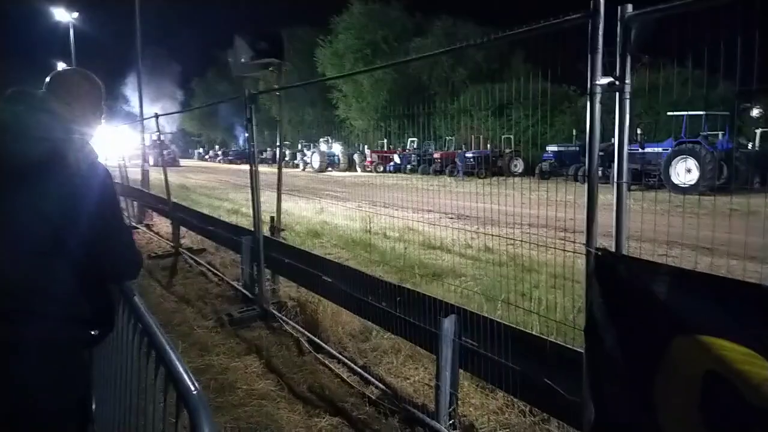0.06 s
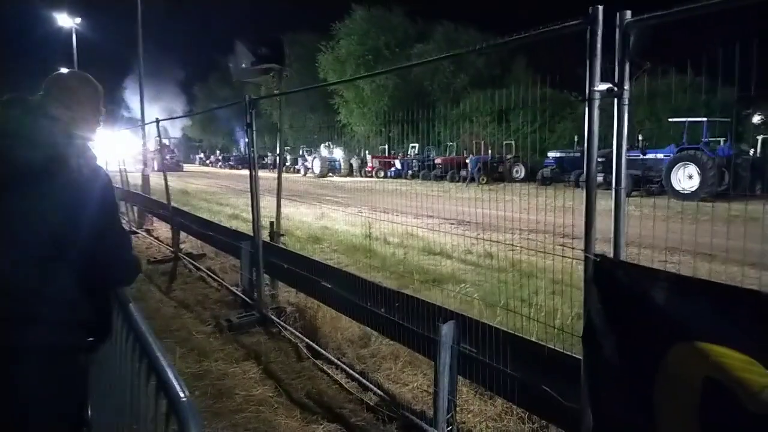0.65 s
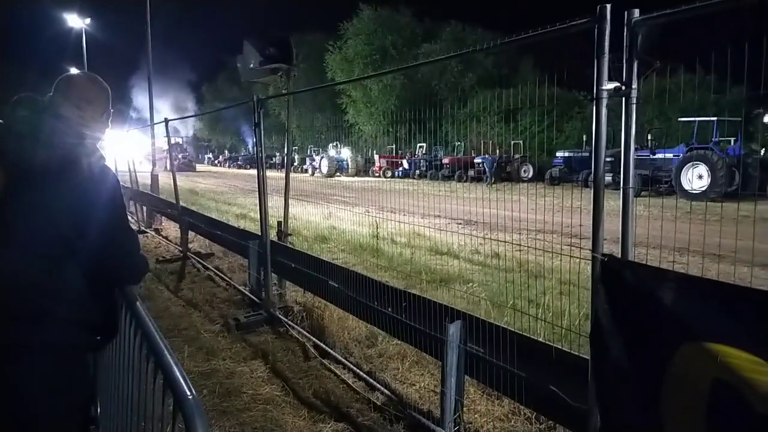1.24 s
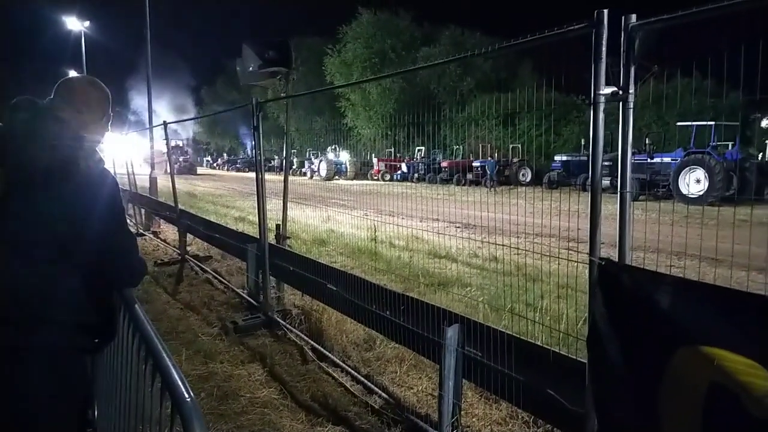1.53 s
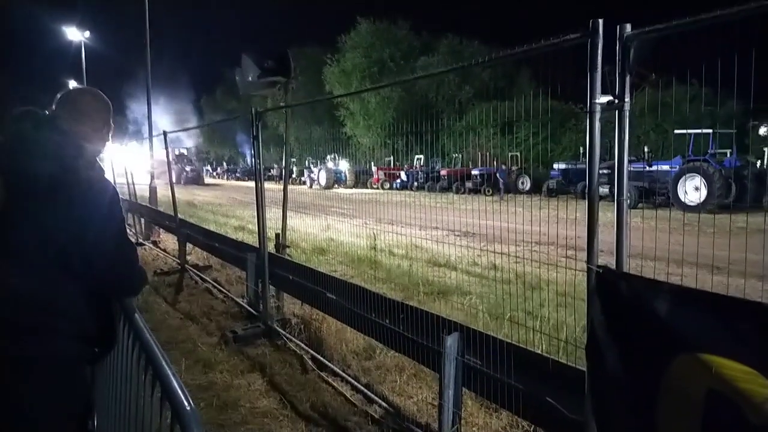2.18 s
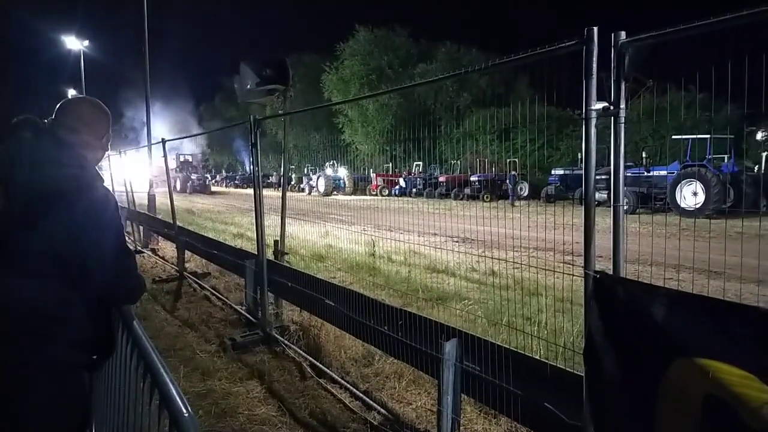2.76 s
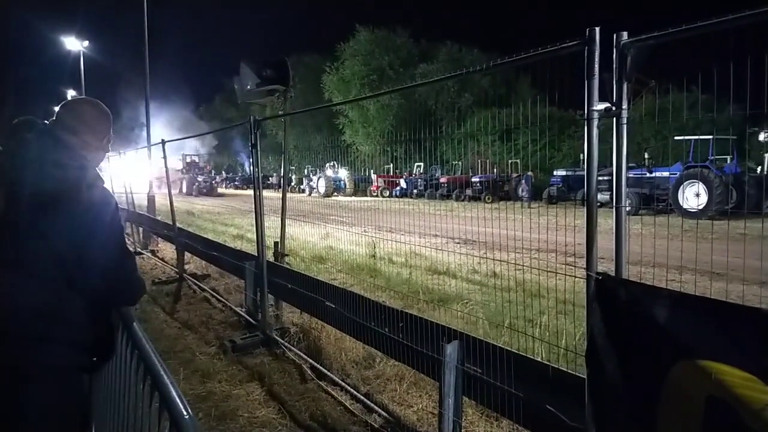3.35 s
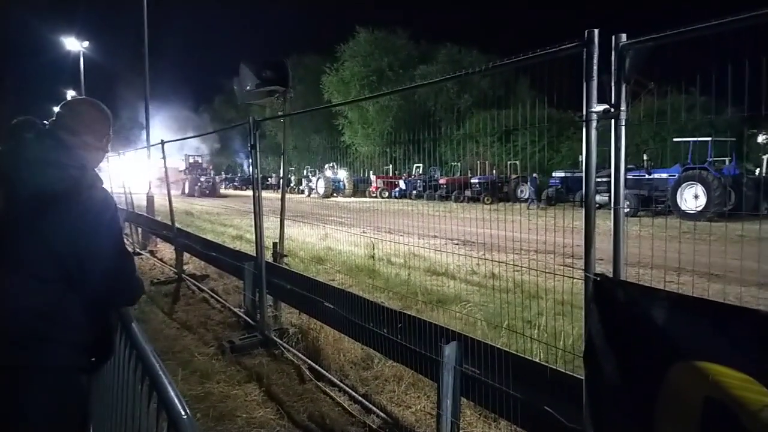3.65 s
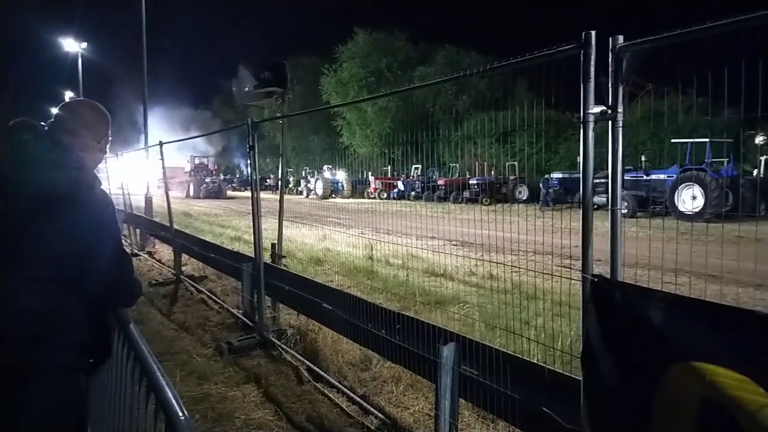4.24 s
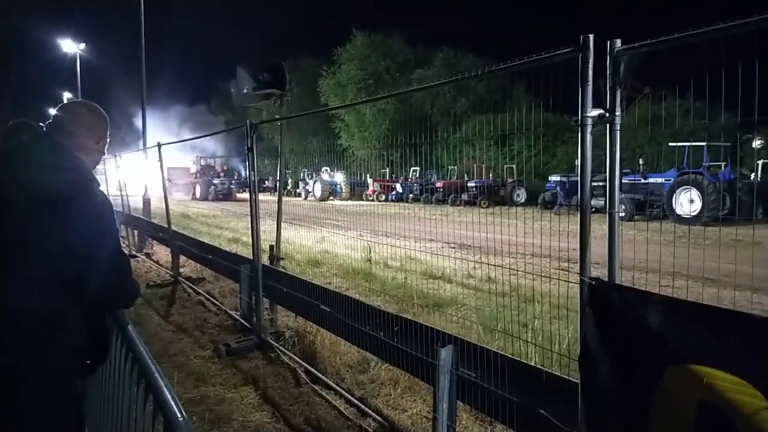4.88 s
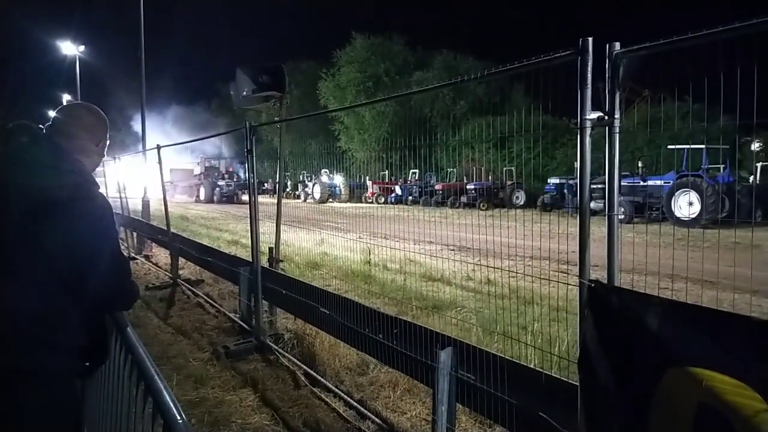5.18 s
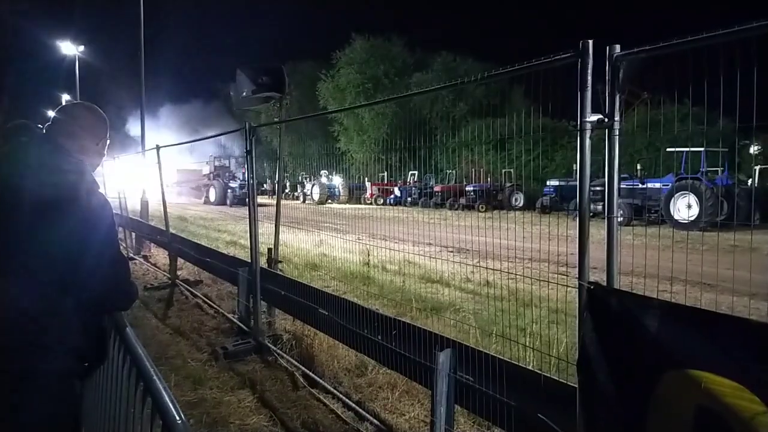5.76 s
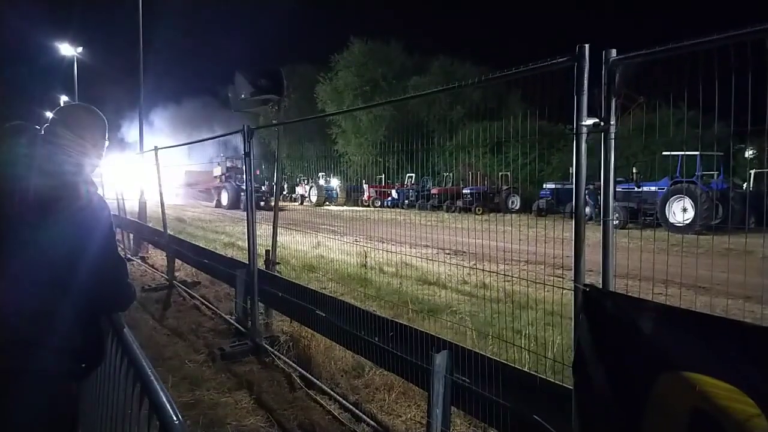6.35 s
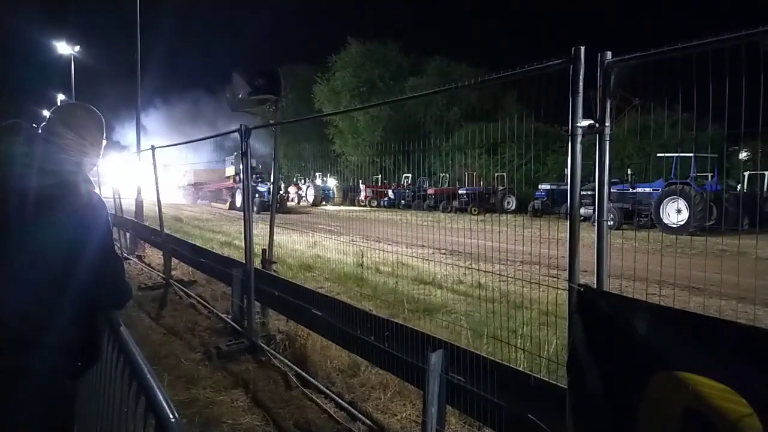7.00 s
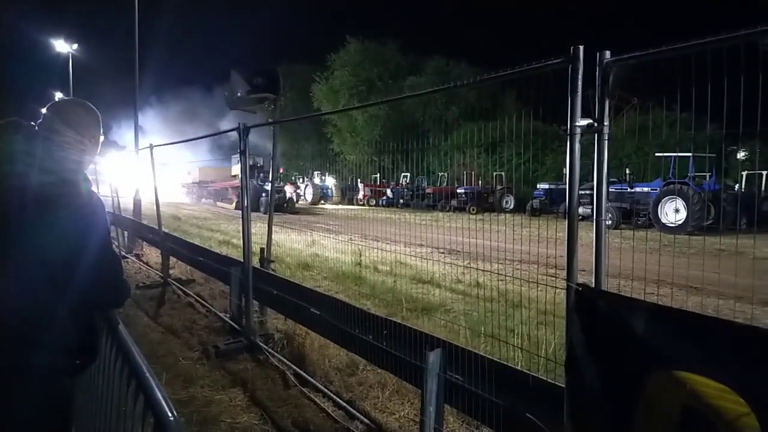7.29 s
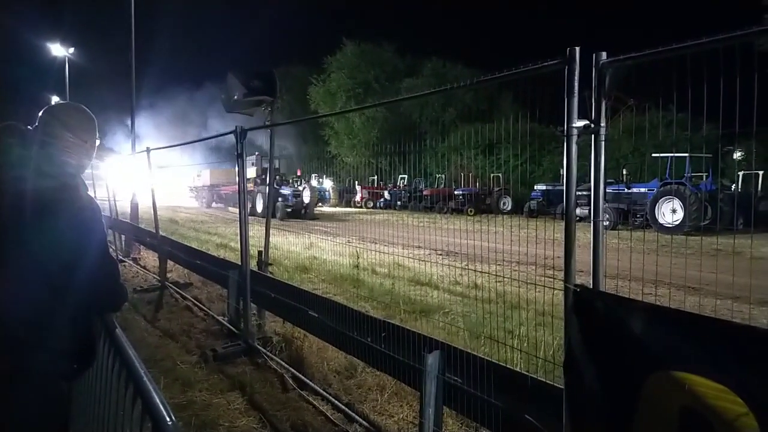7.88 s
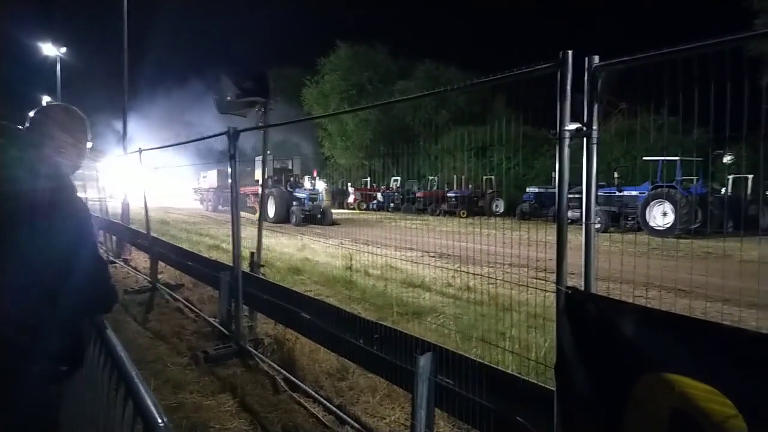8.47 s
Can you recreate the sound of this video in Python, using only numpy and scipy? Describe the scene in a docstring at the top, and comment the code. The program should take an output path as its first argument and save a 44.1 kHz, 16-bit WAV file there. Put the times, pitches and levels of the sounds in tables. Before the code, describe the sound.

A turbocharged tractor engine drones and rasps steadily under heavy load, gradually approaching over a low rumble.

```python
"""A turbocharged six-cylinder pulling tractor drags a sled at full throttle, slowly nearing on a dirt track.
Each firing leaves the open stack as a pressure pulse and a rasping burst of gas; the turbo whistles above.
The ground reflection colours the hiss on the approach, and the tree line answers faintly.
Plume and sled rumble underneath, with a dying breeze on the microphone."""
import sys
import numpy as np
from scipy import signal
from scipy.fft import rfft, irfft, next_fast_len
from scipy.io import wavfile
from scipy.ndimage import map_coordinates

SR = 44100
rng = np.random.default_rng(int(sys.argv[2]) if len(sys.argv) > 2 else 0)


def wav_record(signal):
    """Record a signal, one row per channel, as 16-bit PCM in the file named by sys.argv[1]."""
    frames = np.transpose(np.atleast_2d(signal))
    bounded = np.clip(frames, -1, 1)
    # unit amplitude maps onto the largest positive 16-bit level
    quanta = np.round(bounded * 32767).astype(np.int16)
    wavfile.write(sys.argv[1], SR, quanta)


N = 384993

# Cylinders in firing order. Each row: strength in dB, lateness in firing intervals.
CYLINDERS = [(-2.5, -0.00069), (-4.5, 0.041), (-2.5, -.06), (-5, 0.029), (-3.5, 0.086), (-6.5, -0.12)]
# Exhaust roar envelope. Each row: time in seconds, level in dB.
ROAR_LEVEL = [(0.27, -20.5), (0.72, -20.5), (0.87, -18.4), (0.97, -24), (1.12, -19), (1.27, -19),
              (1.62, -23), (1.72, -20), (2.67, -19.5), (2.92, -22.5), (3.32, -19), (3.57, -21.5),
              (4.02, -20), (4.07, -18), (4.27, -21), (4.42, -19.3), (5.67, -20), (5.87, -20.8), (6.27, -19),
              (7.12, -19.5), (7.77, -20.5), (7.97, -23.5), (8.22, -20.5), (8.68, -23)]


def amp(db):
    """Decibels to gain."""
    return 10 ** (np.asarray(db) / 20)


def unit(x):
    """Scale to rms 1."""
    return x / np.sqrt(np.mean(x ** 2) + 1e-20)


def clock():
    """Sample times in seconds."""
    return np.arange(N) / SR


def ramp(times_s, values):
    """Values joined by straight lines, per sample."""
    return np.interp(clock(), times_s, values)


def curve(rows):
    """Ramp through (seconds, value) rows."""
    return ramp(*np.transpose(rows))


def noise():
    """White noise."""
    return rng.standard_normal(N)


def wobble(knots_per_s):
    """Smooth random curve, rms near 1."""
    knots = rng.standard_normal(int(N * knots_per_s / SR) + 4)
    return map_coordinates(knots, [np.arange(N) * knots_per_s / SR])


def filtered(x, gain_at_hz):
    """Zero-phase filter."""
    size = next_fast_len(N + 8192)
    return irfft(rfft(x, size) * gain_at_hz(np.fft.rfftfreq(size, 1 / SR)), size)[:N]


def coloured(x, spectrum):
    """Minimum-phase filter from (Hz, dB) rows; output at rms 1."""
    size = 8192
    hz, db = np.transpose(spectrum)
    shape_db = np.interp(np.log(np.fft.rfftfreq(size, 1 / SR) + 1), np.log(hz + 1), db)
    cepstrum = irfft(np.log(amp(shape_db) + 1e-6))
    cepstrum[1:size // 2] *= 2
    cepstrum[size // 2 + 1:] = 0
    impulse_response = irfft(np.exp(rfft(cepstrum)))
    return unit(signal.fftconvolve(x, impulse_response)[:N])


def by_distance(far, midway, near):
    """Crossfade three values or signals as the tractor nears."""
    times_s = [3, 5, 6.9, 7.8]
    return (far * ramp(times_s, [1, 0, 0, 0])
            + midway * ramp(times_s, [0, 1, 1, 0])
            + near * ramp(times_s, [0, 0, 0, 1]))


def breeze():
    """Soft, deep buffeting of the microphone, dying away."""
    # Each row: frequency in Hz, relative density in dB.
    spectrum = [(10, -6), (22, -9), (50, -3), (110, -13), (300, -54)]
    fall_db_per_s, gust_db = 2.5, 4
    return amp(-43.5 - fall_db_per_s * clock() + gust_db * wobble(8)) * coloured(noise(), spectrum)


def rumble():
    """Low turbulence of the exhaust plume and the dragged sled."""
    # Each row: frequency in Hz, relative density in dB.
    spectrum = [(18, -52), (30, -12), (107, -8), (156, -1.5), (179, -5.5), (209, -12), (304, -9.5),
                (364, -10), (650, -14), (840, -38), (1430, -120)]
    return amp(-41 + 2.7 * wobble(7)) * coloured(noise(), spectrum)


def tree_echo(x, t60_s, delay_s):
    """Dull, scattered answer from the tree line."""
    t = np.arange(SR // 2) / SR
    tail = rng.standard_normal(len(t)) * amp(-60 * t / t60_s) * (t > delay_s)
    echo = signal.fftconvolve(x, tail / np.linalg.norm(tail))[:N]
    return filtered(echo, lambda hz: 1 / (1 + (hz / 6000) ** 2))


def approaching(x, *spectra):
    """Far, midway and near spectra in turn: the ground reflection's notches shift."""
    return by_distance(*(coloured(x, spectrum) for spectrum in spectra))


def off_boost_db():
    """Level shortfall until the turbo has built up pressure."""
    return ramp([0.95, 1.12], [-2.5, 0])


def turbo(firing_hz):
    """The blade tone lags the engine speed; turbulent exhaust smears it into a fluttering band."""
    inertia_s, cruise_firing_hz, cruise_whistle_hz = .43, 150, 14358
    whistle_per_firing, heating_hz_per_s = 73, 97.5
    speed_db_per_hz, approach_db_per_s = .0025, .6
    width_hz, skirt_db = 160, -12
    pole = np.exp(-1 / (inertia_s * SR))
    lagged_hz = firing_hz[0] + signal.lfilter([1 - pole], [1, -pole], firing_hz - firing_hz[0])
    rise_hz = whistle_per_firing * (lagged_hz - cruise_firing_hz) + heating_hz_per_s * clock()
    roar_db = curve(ROAR_LEVEL)
    surge_db = .5 * (roar_db - np.mean(roar_db)) + off_boost_db()
    level_db = -37.5 + speed_db_per_hz * rise_hz + approach_db_per_s * clock() + surge_db
    angle = 2 * np.pi * np.cumsum(cruise_whistle_hz + rise_hz + 35 * wobble(7)) / SR
    band = lambda hz: np.exp(-.5 * (hz / width_hz) ** 2) + amp(skirt_db) / (1 + (hz / width_hz / 3) ** 2)
    whistle = filtered(noise(), band) * np.cos(angle) + filtered(noise(), band) * np.sin(angle)
    flutter_db = 1.4 * wobble(18) + 1.8 * wobble(130)
    return amp(level_db) * unit(whistle * amp(flutter_db))


def engine_line(phase, order, drift_rad):
    """Sine at order times the firing rate, rms 1, with drifting phase."""
    return np.sqrt(2) * np.sin(2 * np.pi * (order * phase + rng.random()) + drift_rad * wobble(5))


def drone(phase, firing_hz):
    """Firing tone and octave, plus the weaker lines of the uneven four-stroke cycle."""
    # Firing tone, louder when the engine lugs. Each row: time in seconds, level in dB.
    tone_level = [(0.27, -27), (1.57, -31.5), (2.67, -27.5), (2.92, -32), (3.32, -27), (3.47, -31.5),
                  (4.17, -29.5), (4.47, -30.5), (4.87, -25.5), (4.97, -30), (5.32, -24), (5.52, -26),
                  (5.97, -25), (6.42, -29.5), (7.52, -26.5), (7.77, -31), (8.27, -26.5), (8.68, -27.5)]
    # Each row: multiple of the cycle rate, base level in dB.
    cycle_lines = [(2, -51.5), (3, -47), (4, -46.5), (9, -51.5), (10, -56), (11, -56), (13, -54), (15, -55),
                   (16, -56), (17, -59), (18, -49.5), (20, -48.5), (24, -57.5), (25, -56), (26, -51),
                   (28, -46.5), (30, -52)]
    # Resonances lifting any cycle line that glides through. Each row: centre in Hz, width in Hz, lift in dB.
    pipe_modes = [(432, 18, 11), (510, 20, 3), (727, 20, 3)]
    tone_db = curve(tone_level)
    load_db = tone_db - np.mean(tone_db)
    octave_db = by_distance(-38, -37.5, -35.5) + 0.38 * load_db
    tone = amp(tone_db + 0.98 * wobble(9)) * engine_line(phase, 1, drift_rad=.06)
    octave = amp(octave_db + 1.8 * wobble(10)) * engine_line(phase, 2, drift_rad=.19)
    # Upper lines gain on the approach and as harder firing steepens the pulses.
    tilt_db_per_order = by_distance(-1.1, -0.14, 0.57) + 0.19 * load_db
    throb = np.zeros(N)
    for multiple, base_db in cycle_lines:
        order = multiple / len(CYLINDERS)
        lift_db = sum(db / (1 + (2 * (order * firing_hz - hz) / width_hz) ** 2)
                      for hz, width_hz, db in pipe_modes)
        line_db = base_db + lift_db + order * tilt_db_per_order + 1.9 * wobble(2.92)
        throb += amp(line_db) * engine_line(phase, order, drift_rad=.25)
    return tone + octave + throb


def firings(phase, scatter_db, jitter_intervals):
    """One impulse per firing; each cylinder has its own strength and lateness."""
    number = np.arange(1, int(phase[-1]) - 1)
    strength_db, lateness = np.array(CYLINDERS)[number % len(CYLINDERS)].T
    jitter, scatter = rng.standard_normal((len(number), 2)).T
    onsets = np.searchsorted(phase, number + lateness + jitter_intervals * jitter)
    return np.bincount(onsets, amp(strength_db + scatter_db * scatter), N)[:N]


def gas_bursts(pulses, life_s, steady_flow):
    """Turbulent gas swells and dies after each firing, over a steady flow."""
    t = np.arange(SR // 20) / SR
    envelope = unit(signal.fftconvolve(pulses, t * np.exp(-t / life_s))[:N])
    return unit(noise() * (envelope + steady_flow))


def exhaust(pulses):
    """The stack barks near 900 Hz and rasps near 3 kHz; steep shock fronts crackle in the jet."""
    # Spectra by distance. Each row: frequency in Hz, relative density in dB.
    bark_far = [(310, -41), (520, -16.5), (564, -17), (708, -4.5), (764, -3), (904, 4.5), (1060, 1.5),
                (1310, -6.5), (1580, -3), (1710, -10), (1900, -14.5), (2470, -29), (4180, -120)]
    bark_near = [(310, -35.5), (500, -9), (600, -9), (720, -.5), (900, 4), (1060, 1), (1310, -6),
                 (1720, -8), (1900, -12), (2470, -28), (4180, -120)]
    rasp_far = [(1000, -33), (1700, -18.5), (2000, -6.5), (2310, -7), (2660, 2.5), (3360, 1.5),
                (3560, -0.5), (3910, -15.5), (4320, -7.5), (4800, -26), (6240, -41), (10600, -120)]
    rasp_midway = [(1000, -52), (1700, -23), (2040, -12), (2240, -11), (2740, 1.5), (3110, -2),
                   (3570, -7.5), (3780, -15.5), (4310, -13.5), (4680, -19.5), (4800, -43), (6240, -51),
                   (10600, -120)]
    rasp_near = [(1000, -58), (1700, -17), (1930, -6.5), (2280, -7.5), (2680, 3), (2840, -1), (3350, -1),
                 (3710, -9), (4120, -7), (4520, -13), (4800, -20), (6240, -40), (10600, -120)]
    hiss_far = [(2710, -28), (4600, -4.5), (4860, -11.5), (5290, 1), (5470, 2), (5770, -9.5), (6320, 4.5),
                (6610, -3.5), (6920, -3), (8220, -8), (9420, -16), (10400, -11.5), (12800, -17.5),
                (13400, -15), (13600, -18.5)]
    hiss_midway = [(2710, -36), (4600, -9.5), (4680, -13), (4990, 0.5), (5520, -0.5), (7240, 1),
                   (7780, 0.5), (8220, -7), (8640, -6), (9290, -13), (10100, -6.5), (13600, -12.5)]
    hiss_near = [(2710, -22), (4600, -10), (4930, 0.5), (5430, -4), (5980, 1.5), (6550, -4), (7120, 3.5),
                 (7630, -6), (8320, -1.5), (9080, -14.5), (9870, -6.5), (11500, -7), (13800, -10.5)]
    bark_db = by_distance(-9.5, -10.5, -7) + off_boost_db()
    hiss_db = by_distance(-7.5, -9.5, -4)
    puffs = 0.62 * unit(pulses) + gas_bursts(pulses, life_s=.00094, steady_flow=2.1)
    bark = approaching(puffs, bark_far, bark_near, bark_near)
    gas = gas_bursts(pulses, life_s=.0018, steady_flow=1)
    rasp = approaching(gas, rasp_far, rasp_midway, rasp_near)
    jet = unit(gas_bursts(pulses, life_s=.0021, steady_flow=2) * amp(1.53 * wobble(900)))
    hiss = approaching(jet, hiss_far, hiss_midway, hiss_near)
    sizzle = amp(-15) * coloured(jet, [(12000, -34), (13600, 10), (16000, -11)])
    return amp(curve(ROAR_LEVEL)) * (rasp + amp(bark_db) * bark + amp(hiss_db) * (hiss + sizzle))


def scene():
    """Engine speed times the pulses and tones and drives the turbo; moving air makes the treble waver."""
    # Surging and sagging under the sled. Each row: time in seconds, firing rate in Hz.
    engine_speed = [(0.22, 147.9), (0.52, 143.3), (0.87, 145.2), (1.22, 152.6), (1.52, 151.6),
                    (1.72, 156.4), (1.97, 153.6), (2.37, 156.0), (2.67, 150.6), (2.87, 160.3),
                    (3.12, 157.1), (3.32, 157.9), (3.42, 164.9), (3.67, 160.7), (3.92, 166.5),
                    (4.27, 155.9), (5.07, 149.5), (5.27, 145.6), (5.57, 148.9), (5.92, 143.7),
                    (6.42, 148.6), (6.62, 146.9), (6.72, 152.8), (7.27, 156.1), (7.52, 152.3),
                    (7.77, 156.4), (7.97, 154.3), (8.7, 157.4)]
    firing_hz = curve(engine_speed)
    phase = np.cumsum(firing_hz) / SR  # in firings
    roar = exhaust(firings(phase, scatter_db=1.3, jitter_intervals=.012))
    echo = amp(-9.5) * tree_echo(roar, t60_s=.27, delay_s=.03)
    air_waver = amp(0.54 * wobble(13))
    tractor = drone(phase, firing_hz) + air_waver * (roar + turbo(firing_hz))
    return (tractor + echo + rumble() + breeze())[None]


def record(dry):
    """The sound cuts in after a brief silence; the microphone rounds off the tallest peaks."""
    start_s, ceiling, top_hz = .178, .56, 15780
    fade_in_db = ramp([.2, .225], [-9, 0])
    x = dry[0] * (clock() > start_s) * amp(fade_in_db)
    rounded = x / (1 + (x / ceiling) ** 6) ** (1 / 6)
    return filtered(rounded, lambda hz: hz < top_hz)[None]


dry = scene()
out = record(dry)
wav_record(out)
```